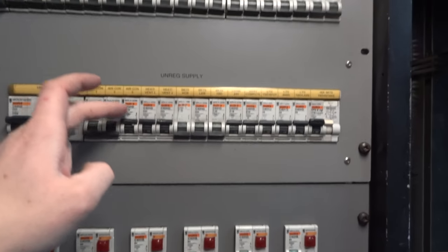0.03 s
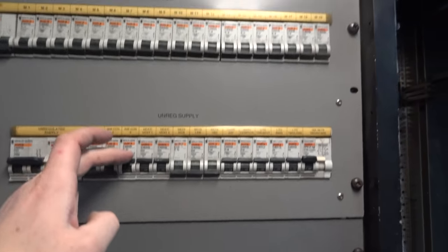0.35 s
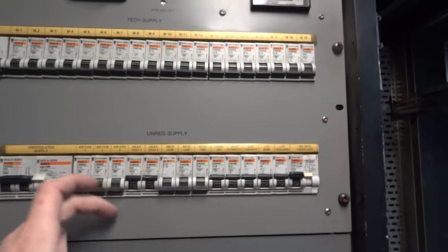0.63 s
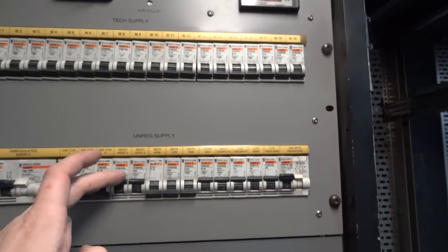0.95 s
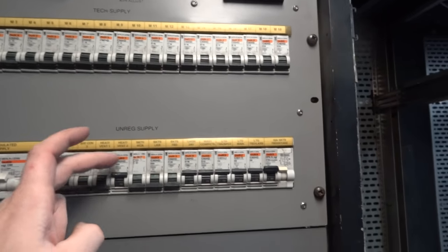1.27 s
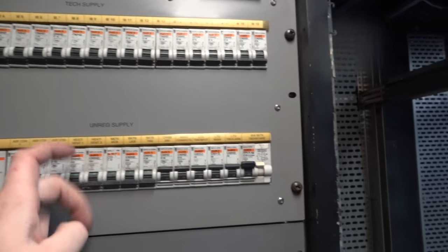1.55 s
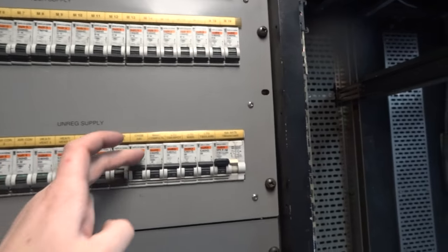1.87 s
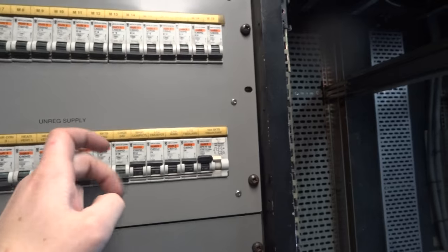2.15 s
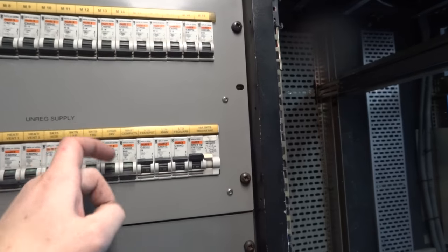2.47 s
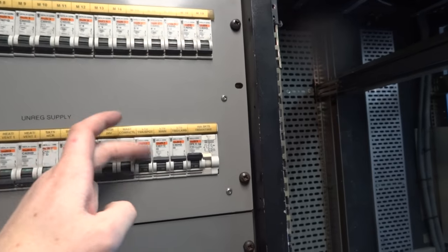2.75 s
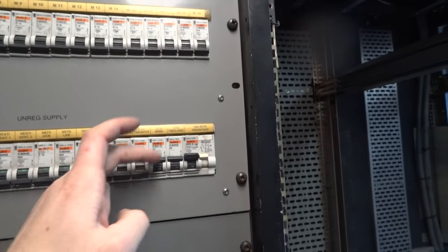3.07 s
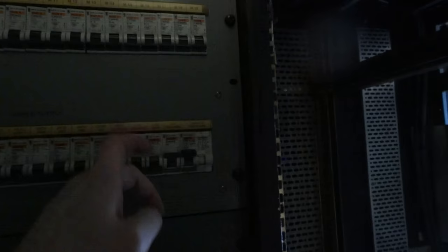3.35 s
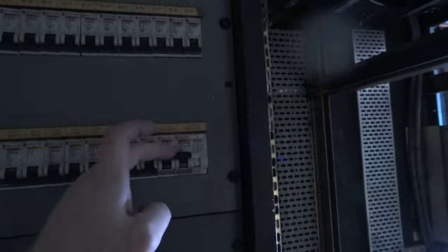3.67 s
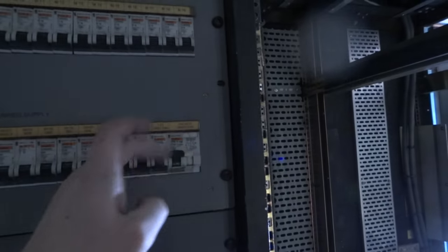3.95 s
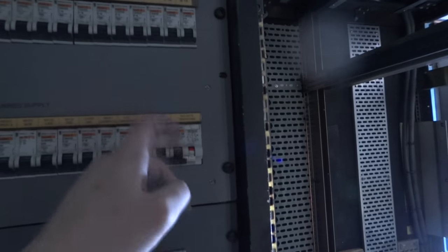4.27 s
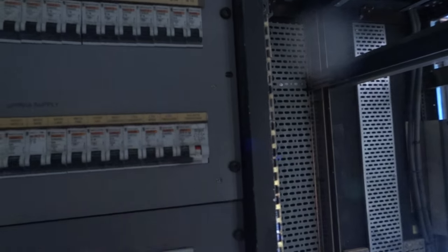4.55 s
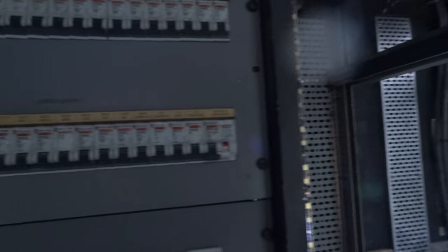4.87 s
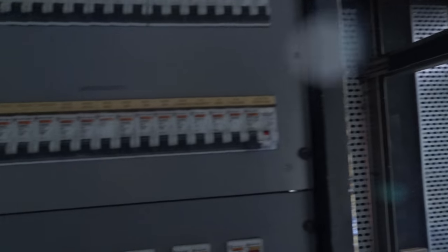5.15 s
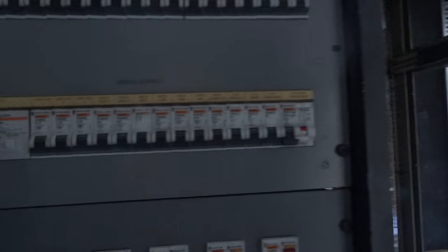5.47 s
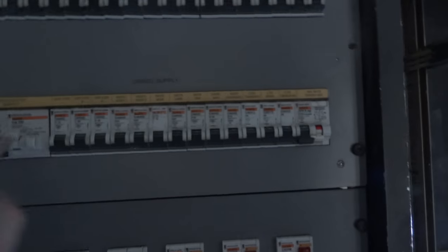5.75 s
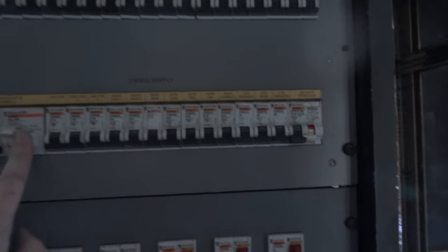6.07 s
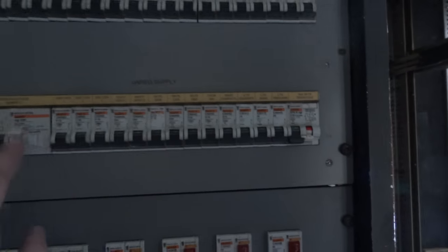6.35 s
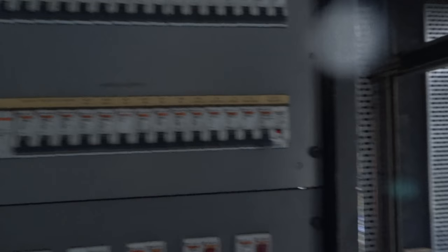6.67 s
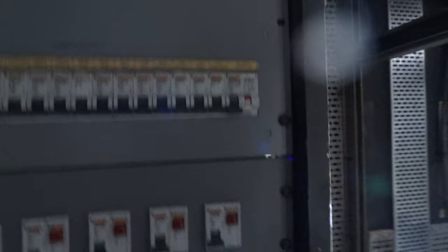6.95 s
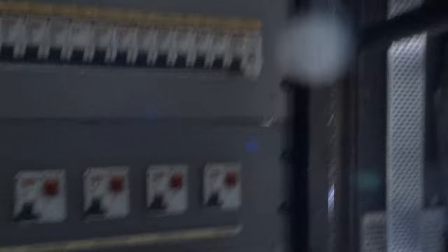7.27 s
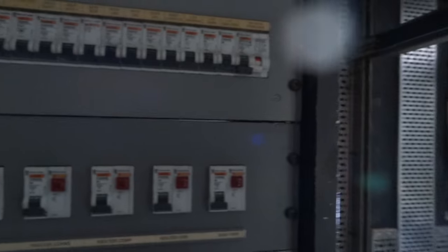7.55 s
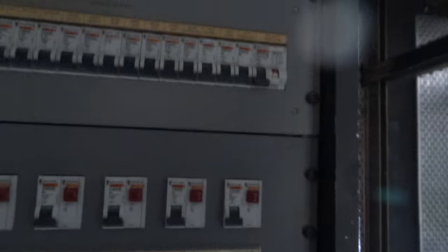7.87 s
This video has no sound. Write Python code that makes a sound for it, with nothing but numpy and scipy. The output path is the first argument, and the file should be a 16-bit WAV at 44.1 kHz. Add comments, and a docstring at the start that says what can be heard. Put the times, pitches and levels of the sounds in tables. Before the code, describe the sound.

Close up inside a truck, circuit breakers on a steel panel are snapped off one by one, each a sharp, bright click with a short echo from close walls. Light fingertip ticks and a few dull relay thuds fall among them, while a ventilation fan coasts down into quiet. After a pause comes one last snap, then a small button is pressed and released, and dry knocks bump the hand-held microphone.

```python
"""Ten circuit breakers snapped off one by one on a steel panel, close up inside an equipment truck.
Each spring slams a contact open and rings its casing. A fingertip ticks on the levers, relays drop out
behind the panel, and a ventilation fan coasts down into the quiet of the cabin. At the end a button is
pressed and something squeaks faintly far off. The stereo microphones sit in a hand-held camera, so
knocks and brushes on its shell arrive dry, while the panel is heard with the echo of close walls."""
import sys
import numpy as np
from scipy import signal
from scipy.fft import rfft, irfft, next_fast_len
from scipy.io import wavfile
from scipy.ndimage import uniform_filter1d, minimum_filter1d

SR = 44100
rng = np.random.default_rng(int(sys.argv[2]) if len(sys.argv) > 2 else 0)


def output_pcm(signal):
    """Save a mono or channel-first signal as 16-bit PCM at the path in sys.argv[1].

    Samples are clipped to [-1, 1] before scaling.
    """
    pcm = np.clip(np.atleast_2d(signal).T, -1, 1) * 32767
    wavfile.write(sys.argv[1], SR, np.round(pcm).astype(np.int16))


N = 357802
TIME = np.arange(N) / SR
HIT_TIME = np.arange(SR // 2) / SR  # time axis of one hit
HIT_SIZE, ONSET_S = len(HIT_TIME), .02  # a hit lands ONSET_S into that axis

# room tone of the parked truck: frequency_hz, level_db
ROOM_TONE = [(18, -79.5), (30, -36.5), (266, -8.5), (328, -7.5), (415, -6), (473, -5.5), (600, -14),
             (844, -11.5), (988, -7.5), (1220, -8), (3310, -14.5), (3980, -16), (4530, -16.5), (16000, -26)]
# stereo width of room tone and brushes, side against mid: frequency_hz, side_db
QUIET_WIDTH = [(60, -7.5), (110, -10), (200, -4.5), (380, -2.5), (700, 8), (1290, -1.5), (2380, -2.5),
               (4400, -6), (8120, -8.5), (15000, -17)]
# air rushing through the fan: frequency_hz, level_db
AIR_RUSH = [(40, -26), (90, -7.5), (145, -0.5), (210, -1), (350, 1), (520, -0.5), (900, 4.5), (1550, -3),
            (2400, -6.5), (4000, -7.5), (9700, -19.5), (16000, -33.5)]
# resonances of the fan's box: pitch_hz, width_hz, level_db
HOUSING_MODES = [(148.7, 8.1, 3), (341.4, 38, 1), (436, 11, 8)]
# resonances of the air duct: pitch_hz, width_hz, level_db
DUCT_MODES = [(644, 65, 0.5), (694, 68, 0.5), (766, 22, -0.5), (819, 12, 5.5), (1007, 160, -21.5)]
# stereo width of the fan: frequency_hz, side_db
FAN_WIDTH = [(60, -21), (110, -40), (200, -28), (380, -25), (700, -16.5), (1290, -14), (2380, -14),
             (4400, -13), (8120, -13), (15000, -20)]
# the cabin's reverberation against the direct sound: frequency_hz, t60_s, level_db
CABIN_REVERB = [(122, 0.74, 4.5), (324, 0.33, 9.5), (800, 0.34, 11), (2120, 0.3, 5.5), (4060, 0.26, 3.5),
                (8400, 0.22, 2.5), (14700, 0.15, -0.5)]
# stereo width of that reverberation: frequency_hz, side_db
ECHO_WIDTH = [(60, -5.5), (110, -27.5), (200, -26), (380, -29), (700, -23), (1290, -15), (2380, -20),
              (4400, -13), (8120, -14), (15000, -18)]
# breakers snapping off: start_s, level_db, latch_lead_ms, crack_hz, crack_db, tilt_db_per_octave
SNAPS = [(0.4916, -4, 0.54, 4700, -1.5, 1.7), (1.0875, -4, 2, 4900, -4.5, 1),
         (1.5721, -3.5, 1.3, 5460, -1, -0.1), (2.076, -1, 1.7, 3900, -8, 2.5),
         (2.4646, -2.5, 1.8, 4200, -13, 0.44), (2.8959, -4, 1.65, 4360, -11, -1),
         (3.3507, -.5, 1.4, 5260, -9, 1.7), (3.7793, -4, 1.3, 4550, -3.5, 1),
         (4.2545, -2.5, 4.45, 13000, -3.5, -0.5), (5.5975, -3.5, 4.8, 5200, -7.5, -0.5)]
# tone of a snap: frequency_hz, level_db
SNAP_COLOUR = [(60, -33.5), (140, -9), (300, -13), (800, -8), (2000, -0.5), (4000, 0), (7000, 3.5),
               (10500, 5), (14000, 5), (16000, -2.5)]
# ring of a breaker's casing, spring and contacts: pitch_hz, width_hz, level_db
CASING_MODES = [(1204, 20.5, 3.5), (3520, 180, -4.5), (4040, 150, -6.5), (4650, 310, -8), (5930, 33, -8),
                (6604, 52.7, -7.5), (9360, 770, -8.5), (10900, 190, -10), (13300, 280, -9.5)]
# one tick just after the first relay's thud, then fingertips on the levers: start_s, level_db, decay_ms
THIN_TICKS = [(0.5902, -9.5, 3.3), (1.4729, -21.5, 6.6), (1.9463, -19.5, 2.6), (1.9885, -23.5, 3.5),
              (2.383, -17, 9.3), (2.812, -18, 8.7), (3.244, -19, 12), (3.695, -19, 8.4), (4.16, -24.5, 42),
              (5.423, -28, 9)]
# relays dropping out behind the panel: start_s, level_db, rattle_ms, tilt_db_per_octave
RELAY_DROPS = [(.563, -4.5, 11, 3), (2.505, -10, 38, -2), (4.281, -10, 20, 8.5)]
# bands of a relay's thud: pitch_hz, width_hz, level_db
RELAY_MODES = [(144, 30, -7.5), (330, 270, 6.5), (1200, 550, 2)]
# knocks on the camera body: start_s, level_db, tilt_db_per_octave
KNOCKS = [(4.188, -31.5, 1), (7.033, -29.5, -4), (7.088, -34, -1.5), (7.1573, -32, -5.5), (7.1961, -14, -1),
          (7.2157, -9, -2.5), (7.2608, -26, -6.5), (7.276, -28.5, -3.5), (7.4756, -34, -2.5),
          (7.6303, -24.5, -6.5), (7.8196, -13.5, 2), (7.8564, -37, -5), (7.9662, -27.5, 2)]
# path through the camera's shell to the microphones: frequency_hz, level_db
SHELL_COLOUR = [(50, -58), (200, -19), (550, -8.5), (900, -12), (1600, 1), (3500, -2), (6000, -9),
                (11000, -6), (16000, -17)]
# resonances of that shell: pitch_hz, width_hz, level_db
SHELL_MODES = [(1220, 110, 4), (1550, 84, 3), (2150, 470, -40), (3420, 110, 3)]
# skin brushing the camera, each brush with its own rasp pitch: peak_s, level_db, fade_s, rasp_hz
BRUSHES = [(7.182, -36, 0.0061, 4500), (7.219, -43.5, 0.041, 3630), (7.423, -42, 0.027, 1170)]
# a button on the main switch, pressed and let go: stop_s, level_db, travel_s
BUTTON_STROKES = [(6.027, -21.5, .043), (6.2888, -13, .0277)]
# each stroke unsticks, scrapes and meets its stop: travel_left_share, level_db, decay_ms
STROKE_STAGES = [(0.97, -10.5, 2.5), (.33, -2.5, 8.7), (0.056, 0, 3.6)]
# resonances of the button: pitch_hz, width_hz, level_db
BUTTON_MODES = [(620, 270, -2.5), (1830, 900, -3.5), (3280, 450, 5.5), (3800, 470, 4), (5800, 550, -8)]
# faint squeaks and coos far off: start_s, level_db, pitch_hz
SQUEAKS = [(6.46, -60, 4080), (6.61, -60, 4060), (6.61, -59, 500), (6.79, -62, 485), (6.80, -61, 3920)]


def undb(db):
    """Decibels to gain."""
    return 10 ** (np.asarray(db) / 20)


def unit(x):
    """Scale to an energy of one."""
    return x / np.sqrt(np.sum(x ** 2) + 1e-18)


def unit_rms(x):
    """Scale to an rms of one."""
    return x / np.std(x)


def freqs(x):
    """Frequency axis of a signal's spectrum."""
    return np.maximum(np.fft.rfftfreq(x.shape[-1], 1 / SR), 1)


def along(points, hz):
    """Read (Hz, value) points on a log-frequency axis."""
    f, value = np.transpose(points)
    return np.interp(np.log(hz), np.log(f), value)


def colour(x, points, tilt=0):
    """Causal filter through (Hz, dB) points, tilted in dB per octave above 1 kHz."""
    f, n = freqs(x), x.shape[-1]
    curve_db = along(points, f) + tilt * np.log2(np.maximum(f, 1000) / 1000)
    cepstrum = irfft(np.log(undb(curve_db)), n)
    cepstrum[1:n // 2] *= 2  # fold to minimum phase
    cepstrum[n // 2 + 1:] = 0
    return irfft(rfft(x) * np.exp(rfft(cepstrum)), n)


def ring(x, modes):
    """Drive a sum of resonances (pitch_hz, width_hz, level_db)."""
    f = freqs(x)
    response = sum(undb(db) / (1 + 1j * (f * f - hz * hz) / (f * width)) for hz, width, db in modes)
    return irfft(rfft(x) * response, x.shape[-1])


def band(x, hz, share):
    """Band-pass: twice through a resonance whose width is a share of its centre."""
    mode = [(hz, hz * share, 0)]
    return ring(ring(x, mode), mode)


def stereo_noise(size, width):
    """Noise at two close microphones: a shared mid, plus and minus a side coloured by width."""
    mid, side = rng.standard_normal((2, size))
    side = colour(side, width)
    return np.array([mid + side, mid - side])


def contact(decay_ms, delay_s=0, spread_db=4):
    """Tiny impacts of uneven size that die away; a long contact is a slide and also swells in."""
    age_ms = (HIT_TIME - ONSET_S - delay_s) * 1000
    rise_ms = max(decay_ms - 3, .01)
    envelope = np.exp(-np.abs(age_ms) / np.where(age_ms < 0, rise_ms, max(decay_ms, .1)))
    impacts = rng.standard_normal(HIT_SIZE) * undb(spread_db * rng.standard_normal(HIT_SIZE))
    return unit(impacts * envelope)


def even_out(force, span_hz=900):
    """Hard, brief blows drive all frequencies about equally: level the spectrum's broad humps."""
    spectrum = rfft(force)
    power = uniform_filter1d(np.abs(spectrum) ** 2, int(span_hz * len(force) / SR))
    return unit(irfft(spectrum / np.sqrt(np.abs(power) + 1e-12), len(force)))


def add(out, at_s, hit):
    """Mix in a hit so that it lands at at_s."""
    start = int((at_s - ONSET_S) * SR)
    hit = hit[..., :N - start]
    out[:, start:start + hit.shape[-1]] += hit


def cabin(wet_db=0, build_s=0.0074, first_echo_s=0.0005):
    """Direct sound, then reflections that crowd in from close walls and die soonest in the treble."""
    noise = stereo_noise(HIT_SIZE, ECHO_WIDTH)
    f, spectrum, response = freqs(noise), rfft(noise), 0
    age = np.maximum(HIT_TIME - first_echo_s, 0)
    centres_hz = np.array(CABIN_REVERB)[:, 0]
    for this_band, (_, t60, db) in zip(np.eye(len(CABIN_REVERB)), CABIN_REVERB):
        weight = along(np.column_stack([centres_hz, this_band]), f)
        envelope = unit((1 - np.exp(-age / build_s)) * np.exp(-np.log(1000) * age / t60))
        response = response + undb(db + wet_db) * envelope * irfft(spectrum * weight, HIT_SIZE)
    response[:, 0] += 1
    return response


def at_mics(hit, room):
    """A hit as it reaches the two microphones through the room's response."""
    return signal.fftconvolve(hit[None], room, axes=1)[:, :HIT_SIZE]


def room_tone(level_db=-57):
    """The quiet of the parked truck, with microphone hiss."""
    noise = stereo_noise(next_fast_len(N), QUIET_WIDTH)
    return undb(level_db) * unit_rms(colour(noise, ROOM_TONE))[:, :N]


def fan(off_s=0.56, coast_s=0.7, rush_db=-34.5, duct_db=-41.5, flutter_db=-0.13):
    """Air drag slows the rotor; the rush of air fades faster than the duct's resonances."""
    speed = 1 / (1 + np.maximum(TIME - off_s, 0) / coast_s)
    size = next_fast_len(N)
    wander = np.interp(TIME, np.linspace(0, TIME[-1], 120), rng.standard_normal(120))
    air = colour(stereo_noise(size, FAN_WIDTH), AIR_RUSH)
    rush = unit_rms(air + ring(air, HOUSING_MODES))[:, :N]
    whirr = ring(stereo_noise(size, FAN_WIDTH), DUCT_MODES)
    duct = unit_rms(band(whirr, hz=694, share=3))[:, :N]
    rush *= undb(rush_db + 60 * np.log10(speed))  # 60 dB down per tenfold slowing
    duct *= undb(duct_db + 22 * np.log10(speed))
    return undb(flutter_db * wander) * (rush + duct)


def snap_force(lead_ms, bounce_ms, bounce_s, slide_db=-22, bounce_db=-4, rattle_db=-8.5):
    """The lever slides, the latch trips, the contact slams open and bounces, the rail rattles."""
    lead_s = lead_ms / 1000
    # a slow latch scrapes more, clicks more softly and leaves a longer rattle
    swell = (HIT_TIME < ONSET_S) * np.exp(-np.abs(HIT_TIME - ONSET_S) / (0.81 * lead_s))
    slide = undb(slide_db) * lead_ms * unit(rng.standard_normal(HIT_SIZE) * swell)
    latch = undb(0.5 - 3 * lead_ms) * contact(0.37 * lead_ms, delay_s=-lead_s)
    bounce = contact(bounce_ms, delay_s=bounce_s * rng.uniform(0.89, 1.2))
    slam = contact(decay_ms=0.99)
    blow = even_out(slide + latch + slam + undb(bounce_db) * bounce, span_hz=429)
    rattle = unit(contact(5.7 * lead_ms, spread_db=8) * (HIT_TIME > ONSET_S))
    return blow + undb(rattle_db) * rattle, bounce


def breakers(gain_db=8.5, panel_db=-13, bounce_ms=1.35, bounce_s=.0021, detune=0.021):
    """Each snap rings a casing tuned a little differently; every spring thumps the panel alike."""
    out = np.zeros((2, N))
    for start_s, db, lead_ms, crack_hz, crack_db, tilt in SNAPS:
        force, bounce = snap_force(lead_ms, bounce_ms, bounce_s)
        modes = [(hz * (1 + detune * rng.standard_normal()), width, mode_db)
                 for hz, width, mode_db in CASING_MODES]
        casing = undb(gain_db + db) * unit(colour(force + ring(force, modes), SNAP_COLOUR, tilt))
        thump = even_out(contact(bounce_ms, bounce_s), span_hz=100)
        panel = undb(panel_db) * unit(band(thump, hz=586, share=1))
        add(out, start_s, at_mics(casing + panel, cabin()))
        # the plastic lever smacks its stop facing the microphones, so less comes from the walls
        smack = even_out(contact(bounce_ms) + bounce)
        crack = undb(gain_db + db + crack_db) * unit(band(smack, crack_hz, share=0.97))
        add(out, start_s, at_mics(crack, cabin(wet_db=-3)))
    return out


def thin_ticks(tick_hz=9500, graze_lead_s=.045, graze_db=-13, graze_ms=19):
    """A faint graze, then a thin tick: once at the first relay, then as a fingertip meets the levers."""
    out, room = np.zeros((2, N)), cabin(wet_db=-12)
    for start_s, db, decay_ms in THIN_TICKS:
        graze = (start_s - graze_lead_s, db + graze_db, graze_ms)
        for at_s, touch_db, touch_ms in [graze, (start_s, db, decay_ms)]:
            tick = unit(band(even_out(contact(touch_ms)), tick_hz, share=1.1))
            add(out, at_s, undb(touch_db) * at_mics(tick, room))
    return out


def relays():
    """An armature falls back and rattles its mounting: a dull thud through the panel."""
    out, room = np.zeros((2, N)), cabin(wet_db=-7.5)
    for start_s, db, rattle_ms, tilt in RELAY_DROPS:
        force = even_out(contact(rattle_ms))
        thud = sum(undb(mode_db + tilt * np.log2(hz)) * band(force, hz, width / hz)
                   for hz, width, mode_db in RELAY_MODES)
        add(out, start_s, undb(db) * at_mics(unit(thud), room))
    return out


def camera_knocks(gain_db=11, pan_db=-2.4, unlike_share=0.38, creak_span_s=(7.6, 7.97), creak_db=-38):
    """Knocks and faint grip creaks come through the shell: dry, a little different at each microphone."""
    out, left_right = np.zeros((2, N)), np.array([[1], [-1]])
    pan = undb(pan_db * left_right / 2)
    creaks = [(np.interp(when, [0, 1], creak_span_s), creak_db, 2 * hardness - 1)
              for when, hardness in rng.random((6, 2))]
    for start_s, db, tilt in list(KNOCKS) + creaks:
        decay_ms = 2 ** (-tilt / 3.5)  # a duller knock is a softer, longer contact
        mid, side = even_out(contact(decay_ms)), even_out(contact(decay_ms))
        force = mid + unlike_share * left_right * side
        shell = colour(force + ring(force, SHELL_MODES), SHELL_COLOUR, tilt)
        add(out, start_s, undb(db + gain_db) * pan * np.array([unit(channel) for channel in shell]))
    return out


def button():
    """A small sprung plastic button rings briefly at each stage of its stroke."""
    out, room = np.zeros((2, N)), cabin(wet_db=-12)
    for stop_s, db, travel_s in BUTTON_STROKES:
        for travel_left, stage_db, decay_ms in STROKE_STAGES:
            click = unit(ring(even_out(contact(decay_ms)), BUTTON_MODES))
            add(out, stop_s - travel_left * travel_s, undb(db + stage_db) * at_mics(click, room))
    return out


def far_squeaks(length_s=0.09, rise=0.0324, waver=0.019):
    """Thin, raspy whistles far away; each rises a little as it swells and fades."""
    out = np.zeros((2, N))
    progress = np.clip((HIT_TIME - ONSET_S) / length_s, 0, 1)
    for start_s, db, pitch_hz in SQUEAKS:
        wobble = 1 + waver * unit_rms(uniform_filter1d(rng.standard_normal(HIT_SIZE), size=120))
        hz = pitch_hz * (1 + rise * (progress - .5)) * wobble
        whistle = np.sin(np.pi * progress) ** 2 * np.sin(2 * np.pi * np.cumsum(hz) / SR)
        add(out, start_s, undb(db) * at_mics(whistle, cabin(wet_db=-7)))
    return out


def camera_brushes(catch_db=2, rasp_share=0.24, rasp_db=6):
    """Skin catches and slips on the shell, right at the microphones: a dry rasp that swells and fades."""
    out, middle_s = np.zeros((2, N)), HIT_TIME.mean()
    for peak_s, db, fade_s, rasp_hz in BRUSHES:
        catches = undb(catch_db * np.repeat(rng.standard_normal(HIT_SIZE), 64)[:HIT_SIZE])
        skin = catches * stereo_noise(HIT_SIZE, QUIET_WIDTH)
        rasp = ring(skin, [(rasp_hz, rasp_hz * rasp_share, rasp_db)])
        rub = unit_rms(colour(skin + rasp, SHELL_COLOUR))
        envelope = np.exp(-np.abs(HIT_TIME - middle_s) / fade_s)
        add(out, peak_s - middle_s + ONSET_S, undb(db) * rub * envelope)
    return out


def scene():
    """Everything at the microphones: the panel close by, the handling, the background."""
    panel = breakers() + button() + thin_ticks() + relays()
    handling = camera_knocks() + camera_brushes()
    return panel + handling + far_squeaks() + fan() + room_tone()


def record(dry, low_cut_hz=60, limit_db=-3.5, limit_s=.001, top_hz=15950):
    """The camera thins the deep bass, limits the loudest peaks and cuts the top."""
    thinned = signal.sosfilt(signal.butter(2, low_cut_hz, "high", fs=SR, output="sos"), dry)
    span = int(limit_s * SR) + 1
    allowed = undb(limit_db) / np.maximum(np.abs(thinned).max(axis=0), undb(limit_db))
    gain = uniform_filter1d(minimum_filter1d(allowed, span), span)
    return signal.sosfilt(signal.ellip(10, .2, 70, top_hz, fs=SR, output="sos"), gain * thinned)


dry = scene()
out = record(dry)
output_pcm(out)
```